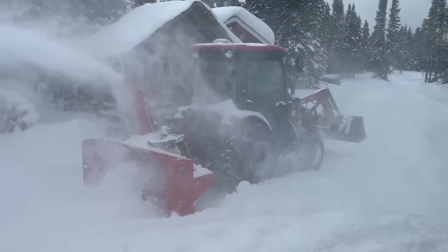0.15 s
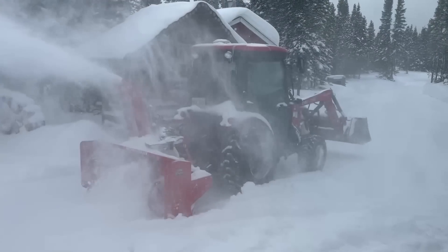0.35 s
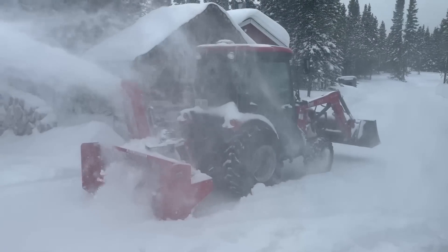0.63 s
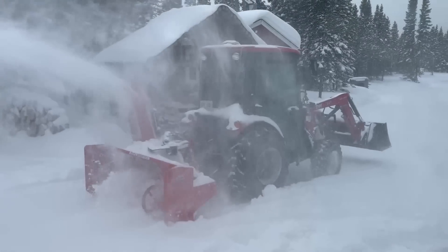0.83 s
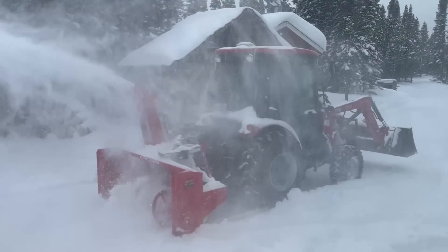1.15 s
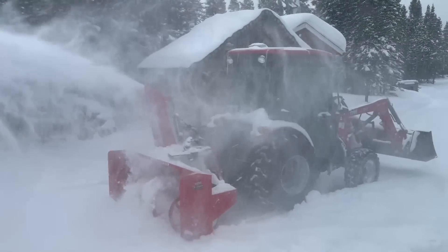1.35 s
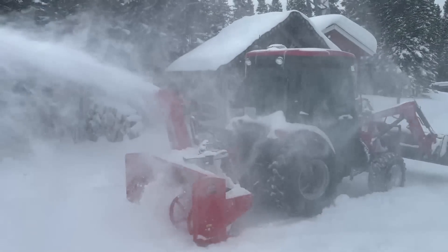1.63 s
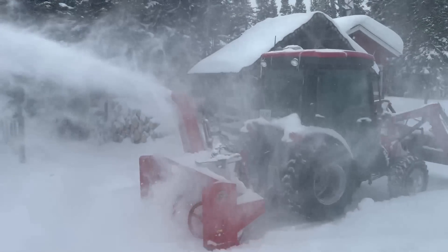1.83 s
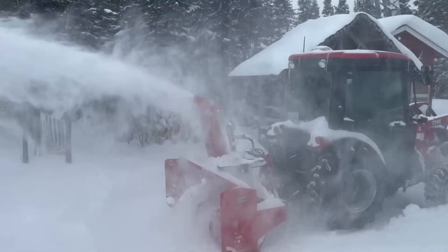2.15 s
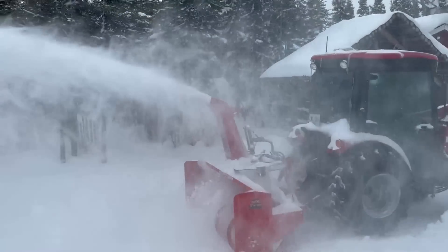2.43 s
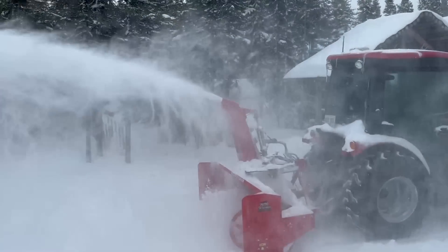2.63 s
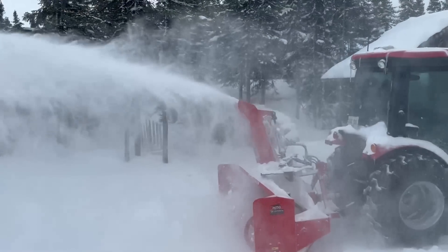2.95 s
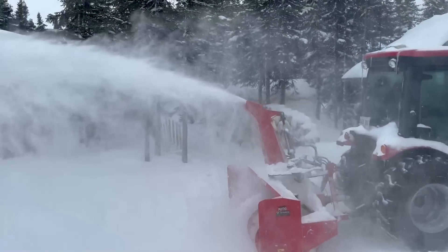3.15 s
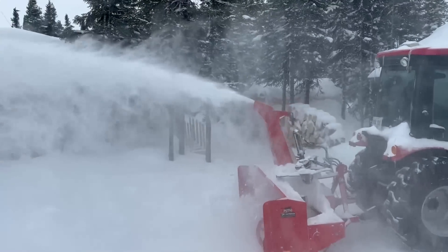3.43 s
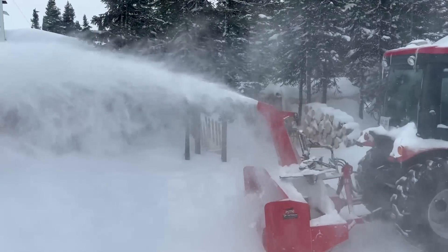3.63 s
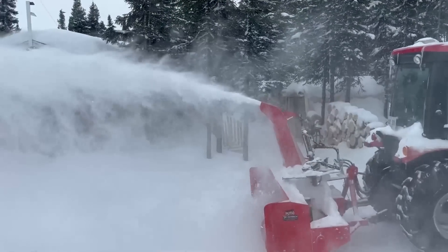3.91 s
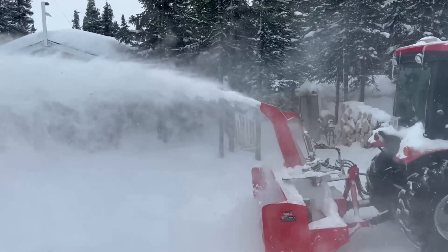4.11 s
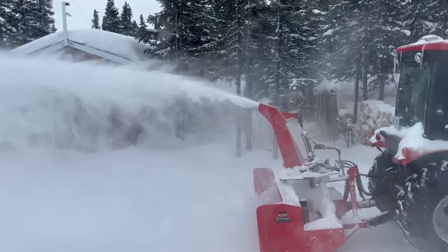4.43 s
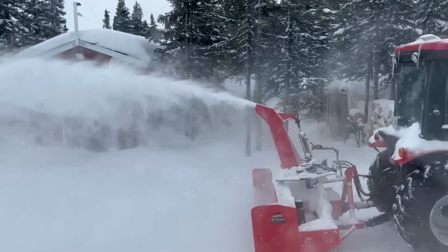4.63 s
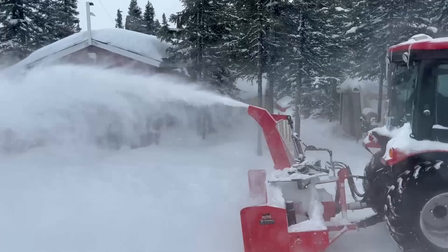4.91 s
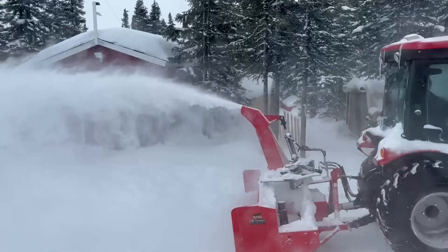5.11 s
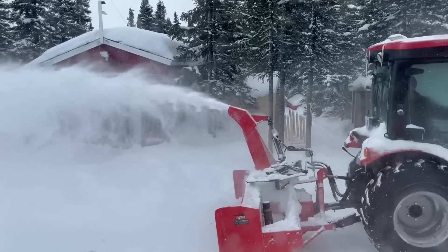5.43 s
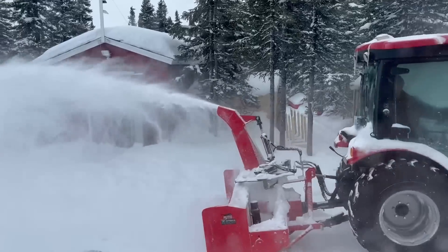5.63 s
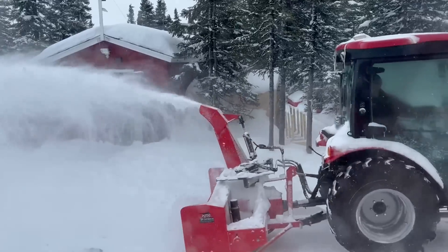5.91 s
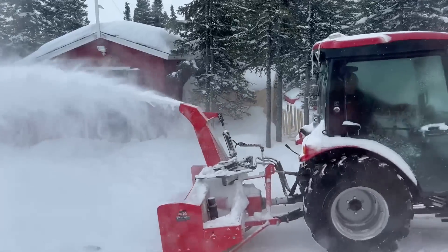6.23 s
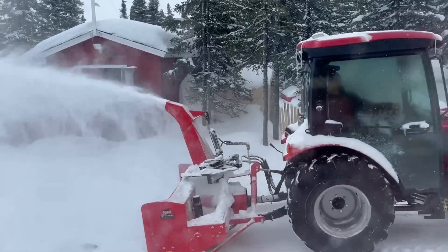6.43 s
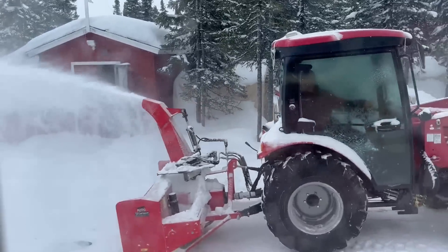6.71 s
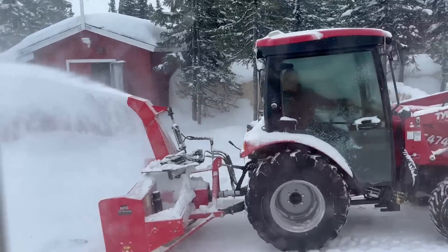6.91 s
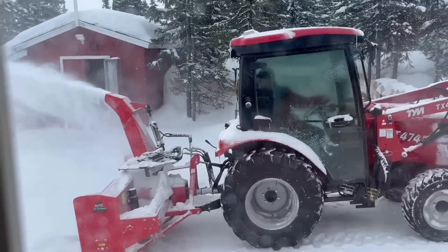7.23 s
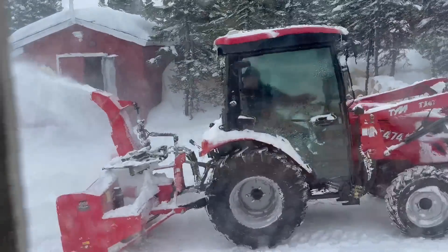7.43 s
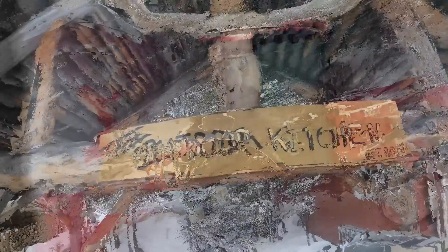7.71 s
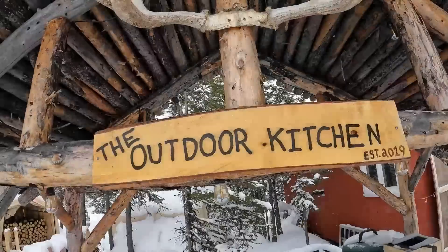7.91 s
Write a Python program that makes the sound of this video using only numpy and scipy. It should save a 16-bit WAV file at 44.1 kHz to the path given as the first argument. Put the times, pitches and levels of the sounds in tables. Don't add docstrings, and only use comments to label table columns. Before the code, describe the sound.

Tractor engine hum with a thudding snowblower and rushing snow spray, faint metal squeals and clinks, fading quickly to wind rumbling on the microphone.

```python
import sys
import numpy as np
from scipy import signal
from scipy.fft import rfft, irfft, next_fast_len
from scipy.io import wavfile
from scipy.ndimage import uniform_filter1d

SR = 44100
rng = np.random.default_rng(int(sys.argv[2]) if len(sys.argv) > 2 else 0)


def how_loud(loudness_db):
    steps = np.asarray(loudness_db, float) / 20
    return 10 ** steps


def generate_wav(sig):
    pcm = np.round(np.clip(np.atleast_2d(sig).T, -1, 1) * 32767).astype(np.int16)
    wavfile.write(sys.argv[1], SR, pcm)


N = 355446
TIME = np.arange(N) / SR
STEP = 12
FADE_S = (7.527, 7.951)
SNOW_ENDS_S = (7.4, 7.6)


def unit(x):
    return x / np.sqrt(np.mean(x ** 2) + 1e-20)


def along(points, hz, index=1):
    cols = np.transpose(points)
    return np.interp(np.log(hz + 1), np.log(cols[0] + 1), cols[index])


def curves(rows):
    s, *cols = np.transpose(rows)
    return [np.interp(TIME, s, c) for c in cols]


def between(share, start, end):
    return start + share * (end - start)


def ramp(start, end):
    return np.interp(TIME, [start, end], [0, 1])


def bursts(rows, rise, fall):
    def shape(s, hold, db):
        corners = np.cumsum([s - rise, rise, hold, fall])
        return np.interp(TIME[::STEP], corners, [0, how_loud(db), how_loud(db), 0])
    return np.interp(TIME, TIME[::STEP], sum(shape(*row) for row in rows))


def wobble(rate, step=1):
    return np.interp(np.arange(0, N, step) * rate / SR, np.arange(2500), rng.standard_normal(2500))


def filtered(x, response):
    m = next_fast_len(N + 8192)
    return irfft(rfft(x, m) * response(np.fft.rfftfreq(m, 1 / SR)), m)[..., :N]


def rush(spectrum, patchy_db):
    z = signal.stft(rng.standard_normal((2, N)), nperseg=512)[2]
    field = uniform_filter1d(rng.standard_normal(z.shape[1:]), 5, 0)
    field = uniform_filter1d(field, 12, 1)
    pair = signal.istft(z * how_loud(patchy_db * unit(field)), nperseg=512)[1][:, :N]
    return unit(filtered(pair, lambda hz: how_loud(along(spectrum, hz))))


def partial(turns, db, sway_db, blur, rate, start=None):
    def tone(chance):
        level = how_loud(db + sway_db * wobble(rate, STEP))
        phase = 2 * np.pi * (turns + (chance if start is None else start))
        return level * np.sin(phase + blur * wobble(rate, STEP))
    return np.sqrt(2) * np.array([tone(rng.random()), tone(rng.random())])


# frequency in Hz, level in dB per Hz.
BUFFET_COLOUR = [(15, -36.5), (35, -2.5), (60, 8.5), (110, -0.5), (200, -10), (300, -24.5), (500, -60),
                 (900, -120)]
# frequency in Hz, level in dB per Hz.
FLUTTER_COLOUR = [(60, -51), (150, 7), (300, -1.5), (520, -9), (850, -29), (1500, -50), (2800, -78),
                  (5000, -120)]
# frequency in Hz, level in dB per Hz.
WHIP_COLOUR = [(300, -40), (600, 0), (900, -9), (1500, -24), (2800, -36), (5000, -60), (8000, -120)]
# start in seconds, length in seconds, level in dB over the buffet.
FLAPS = [
    (7.9, .16, -22),
    (7.962, .003, -16),
    (7.986, .004, -11),
    (7.994, .012, -6),
    (8.013, .003, -8),
    (8.024, .012, -4),
    (8.041, .02, -4),
]
# time in seconds, size (minus is inward).
SNAPS = [
    (7.9635, -.35),
    (7.9862, .6),
    (7.9972, 1),
    (8.0145, -1.1),
    (8.0272, -.7),
    (8.031, -.7),
]


def wind():
    steady = [rush(colour, patchy_db=.5)[0] for colour in (BUFFET_COLOUR, FLUTTER_COLOUR, WHIP_COLOUR)]
    buffet, flutter, whip = [v / np.sqrt(np.abs(uniform_filter1d(v * v, 2500)) + .1) for v in steady]
    flaps = bursts(FLAPS, rise=.003, fall=.005) * how_loud(1.5 * wobble(90))
    gust = buffet + flaps * (flutter + how_loud(-21) * ramp(8.0, 8.025) * whip)
    snap_s = .0006
    snaps = sum(size * np.exp(-.5 * ((TIME - s) / snap_s) ** 2) for s, size in SNAPS)
    return how_loud(-31) * snaps + how_loud(-37) * ramp(7.75, 7.94) * gust


def yard_hum():
    return partial(120 * TIME[::STEP], -48.5, sway_db=1, blur=.1, rate=5)


# frequency in Hz, level in dB per Hz.
CLOTH = [(2000, -30), (3000, -3), (4500, 1), (5500, 0), (7235, -5), (7967, -14.0), (8182, -24.8),
         (8785, -25.2), (9776, -8.2), (11886, -7.6), (14298, -17.1), (14599, -33.0), (14771, -27.5),
         (15688, -120)]
# frequency in Hz, level in dB per Hz.
CLOTH_SIDE = [(3000, -24), (5200, -4), (7000, -3), (8400, 0), (9500, -1), (10600, -8), (14000, -6)]
# start in seconds, length in seconds, level in dB.
RUBS = [(.92, .28, -82), (.955, .01, -82), (1.08, .1, -86), (1.12, .06, -88), (1.2, .03, -90),
        (2.05, .02, -97), (2.585, .02, -95), (3.09, .05, -95), (4.08, .05, -95), (5.0, .1, -98),
        (6.52, .03, -94), (6.82, .02, -95), (7.3, .08, -95), (6.215, .03, -88), (6.3, .03, -89),
        (6.44, .03, -92), (7.022, .01, -88), (7.208, .018, -88), (7.5, .15, -97)]
# time in seconds, level in dB.
TICKS = [(0.9278, -67), (0.9424, -65), (0.9557, -60), (0.963, -67), (1.004, -69), (1.112, -72),
         (1.1694, -68), (1.2454, -82), (2.0594, -81), (2.5855, -75), (6.2203, -76), (6.3194, -78),
         (6.4694, -79), (7.0229, -74), (7.214, -73)]


def rustle(turn, closing):
    side_db = -3.5
    grains = how_loud(2 * wobble(250) + 1.5 * wobble(40)) * rush(CLOTH, patchy_db=1)
    side = how_loud(side_db) * rush(CLOTH_SIDE, patchy_db=2)[0] * [[1], [-1]]
    sifting = how_loud(between(turn, -97, -94.5) + 1.5 * wobble(6.6))
    level = sifting + bursts(RUBS, rise=.004, fall=.025)
    hiss = how_loud(2) * (closing + .2) * level * (grains[0] + side)
    ticks, t = np.zeros(N + 400), np.arange(300) / SR
    for s, db in TICKS:
        tick = how_loud(-60 * t / .002) * rng.standard_normal(len(t))
        ticks[round(s * SR):][:len(t)] += how_loud(db - 3) * unit(tick)
    mid, side = filtered(ticks[:N], lambda hz: how_loud([along(CLOTH, hz), along(CLOTH_SIDE, hz) + side_db]))
    return hiss + mid + side * [[1], [-1]]


# start in seconds, end in seconds, frequency in Hz, level in dB, blur in radians.
SQUEALS = [(0, 2.9, 1722, -72, .9), (.4, 1.2, 1150, -68, .4), (2.3, 2.7, 1210, -70, .4),
           (1.65, 1.95, 1700, -66, .6), (.95, 1.2, 1560, -67, .5), (.5, .85, 4700, -81, 4.5),
           (1.65, 2.0, 5000, -83, 3), (7.05, 7.5, 3300, -78, .4), (6.17, 6.3, 6300, -82, 4.5),
           (2.9, 3.6, 1730, -73.5, 1.1), (1.648, 2.1, 4200, -76, 3.2), (1.947, 2.6, 3250, -76, 4.2),
           (3.9, 6.2, 3750, -78, 4.2), (5.2, 5.6, 3357, -74.5, 0.4), (6.5, 7.3, 4420, -81.5, 1.7),
           (7.019, 7.037, 4420, -63.5, .7), (7.02, 7.034, 4700, -68, .7), (2.9, 4.6, 900, -66, 1.2),
           (2.6, 3.7, 1750, -70, 1.3), (6.2, 7.7, 1100, -69, .6), (6.1, 7.1, 2300, -73, .8),
           (1.85, 2.65, 1415, -66.5, .7), (1.4, 2.1, 745, -66, 1.3), (.9, 1.65, 1717, -66, .35),
           (.9, 1.7, 1324, -71, .5), (.4, 1.7, 1507, -69, .7), (.2, .95, 1890, -68, .55),
           (2.3, 2.95, 1700, -67, .7), (5.2, 6.2, 5500, -90, 3), (6.9, 7.2, 6050, -88, 3.5),
           (.9, 1.25, 4150, -82, 4)]


def squeal():
    out = np.zeros(N)
    for start, end, hz, db, blur in SQUEALS:
        on = slice(round(start * SR), round(end * SR))
        edge_s = min(.063, (end - start) / 3)
        swell = np.clip(np.minimum(TIME[on] - start, end - TIME[on]) / edge_s, 0, 1)
        whistle = np.sin(2 * np.pi * hz * TIME[on] + blur * wobble(150)[on])
        out[on] += swell * how_loud(db + 1.5 * wobble(20)[on]) * whistle
    return out


# time in seconds, peak in dB, frequency in Hz.
CLINKS = [(0.0712, -65, 4090), (0.0962, -61, 4150), (0.1396, -62, 4110), (0.166, -66, 4140),
          (0.2049, -65, 4630), (0.2309, -59, 4620), (0.2588, -62, 4150), (0.2783, -60, 4150),
          (0.3765, -60, 4170), (0.3944, -59, 4100), (0.5407, -58, 4690), (0.5926, -63, 3840),
          (0.6853, -64, 5120), (0.7422, -65, 4940), (0.8071, -66, 4520), (1.1644, -58, 4660),
          (1.5838, -66, 3990), (2.0098, -66, 4200), (3.015, -64, 3800), (3.1098, -62, 3890),
          (4.4672, -61, 3860), (4.5496, -65, 3950), (4.5965, -65, 3850), (5.5199, -58, 3860),
          (5.7149, -64, 3830), (5.8985, -64, 3800), (6.0965, -63, 4030), (7.2853, -64.5, 4280)]


def chain():
    out, t = np.zeros(N + SR), np.arange(1500) / SR
    t60_s, attack_s = 0.033, 0.0012
    for s, db, hz in CLINKS:
        ring = np.sin(2 * np.pi * hz * t) + how_loud(-5) * np.sin(2 * np.pi * 1.13 * hz * t)
        out[round(s * SR):][:len(t)] += how_loud(db - 2 - 60 * t / t60_s) * (1 - np.exp(-t / attack_s)) * ring
    return out[:N]


# start in seconds, length in seconds, frequency in Hz, level in dB.
DRUMS = [
    (5.2, .7, 312, -52),
    (7.1, .38, 283, -45.5),
    (5.0, .25, 217, -47),
    (5.75, .25, 250, -49),
    (.25, .25, 282, -47),
    (1.75, .25, 282, -47),
    (2.7, .3, 282, -46),
    (3.55, .45, 430, -54),
    (4.25, .7, 436, -59),
    (5.75, .3, 283, -49),
]


def plates():
    return sum(bursts([(s, hold, db)], rise=.08, fall=.08)[::STEP]
               * partial(hz * TIME[::STEP], 0, sway_db=2, blur=.3, rate=10) for s, hold, hz, db in DRUMS)


# frequency in Hz, level in dB per Hz.
RUMBLE_COLOUR = [(20, -61.5), (30, -26.5), (42, -3.5), (56, 2.5), (68, -1), (100, -2), (135, -3),
                 (180, 3.5), (200, -7), (250, 0), (300, -8), (345, -12.5), (420, -21), (520, -66.5)]


def augers(fade_db):
    dig_db = 3 - 12.5 * (1 - ramp(0, 0.72)) - 4 * ramp(*SNOW_ENDS_S)
    rumble = how_loud(fade_db + dig_db - 43.5 + wobble(3)) * rush(RUMBLE_COLOUR, patchy_db=1)
    growl = how_loud(between(ramp(1.5, 7.2), -4.5, 8))
    return rumble + (growl - 1) * filtered(rumble, lambda hz: hz < 65.6)


# time in seconds, firing rate in Hz, level of the first order in dB.
ENGINE = [(0, 79.56, -38), (.4, 79.56, -50), (.8, 79.58, -33), (1.05, 79.45, -31.5), (1.4, 78.8, -36),
          (1.75, 79.3, -30), (2.2, 79.42, -26.4), (2.85, 79.35, -28.2), (3.6, 79.83, -24.2),
          (4.2, 80.24, -25.6), (4.85, 80.48, -27.4), (5.4, 79.97, -25.8), (5.9, 80.0, -26.2),
          (6.45, 79.55, -26.1), (7.0, 79.08, -22.6), (7.28, 78.8, -23.2), (7.5, 78.58, -25.3),
          (8.06, 78.6, -24.5)]
# time in seconds, tailpipe minus intake (a factor).
PIPE = [(0, -.44), (.9, -.5), (1.4, -.33), (2.0, .02), (2.4, .3), (3.2, .52), (3.6, .7), (4.6, .9),
        (5.1, 1.2), (6.0, 1.05), (7.2, .85), (8.06, .7)]
# multiple of the firing rate, level in dB.
CRANK = [(.5, -55), (.75, -56), (1.25, -60), (1.75, -54), (2.5, -58), (3, -58)]


def engine(firings, fade_db, closing):
    first_db = curves(ENGINE)[1][::STEP]
    tailpipe = how_loud(-35) * curves(PIPE)[0][::STEP]
    first = partial(firings, first_db, sway_db=.6, blur=0.022, rate=3.7, start=0)
    second = partial(2 * firings, 0, sway_db=.9, blur=.1, rate=8, start=.148)
    weak = sum(partial(k * firings, db + fade_db, sway_db=3, blur=0.3, rate=6) for k, db in CRANK)
    return closing * (first + np.sqrt(closing) * tailpipe * second + yard_hum()) + weak


# multiple of the blade rate, then level in dB heard from the blower end,
# from the side and from behind the chute.
BLADES = [(1, -69, -68.5, -67), (2, -42.5, -53, -47.5), (3, -62.5, -65, -58.5), (4, -61, -56, -46.5),
          (6, -53.5, -44.5, -51), (7, -43.5, -52, -52), (8, -55.5, -52.5, -54), (9, -56.5, -60, -62.5),
          (10, -53.5, -62, -59), (11, -56.5, -62.5, -67.5), (12, -58.5, -53, -58.5),
          (13, -65.5, -65.5, -66), (14, -66.5, -67, -68), (15, -69, -66.5, -68), (16, -70.5, -65.5, -75),
          (17, -76, -70.5, -67), (18, -65.5, -64, -67)]
# frequency in Hz, level in dB from the end, level in dB from the side,
# blur in radians.
HOUSING = [(113.5, -47, -57.5, 0.32), (268, -54, -59.5, 1.2), (280.4, -47, -49, .9), (312.8, -59, -56, 1.6)]
# start in seconds, length in seconds, level in dB.
BOOMS = [
    (.3, 0.056, -2),
    (1.0, 0.031, 3.5),
    (1.3, 0.5, 6.5),
    (2.6, 0.33, -5.5),
    (3.5, 0.079, 5),
    (4.3, .35, 1.5),
    (5.4, .15, 7),
    (5.9, 0.11, 5.5),
    (6.5, 0.22, 5),
    (7.0, 0.33, 13),
]


def impeller(firings, blades, turn, slap_db):
    passed = ramp(3.8, 6.6)[::STEP]
    out = 0
    for k, end_db, side_db, behind_db in BLADES:
        view_db = between(turn, end_db, side_db) + passed * (behind_db - side_db)
        out = out + partial(k * blades, view_db + slap_db, sway_db=1.9, blur=.17, rate=6)
    swell = how_loud(-6.5) + bursts(BOOMS, rise=0.14, fall=0.14)[::STEP] / 2
    boom_db = between(turn, -41.5, -40) + slap_db + 20 * np.log10(swell)
    out = out + partial(2.25 * firings, boom_db, sway_db=2.8, blur=.75, rate=12)
    for hz, end_db, side_db, blur in HOUSING:
        plate_db = between(turn, end_db, side_db) + slap_db
        out = out + partial(hz * TIME[::STEP], plate_db, sway_db=3.5, blur=blur, rate=12)
    return out


PUFF = [(1, .085), (2, .04), (3, .04), (4, .04)]
# frequency in Hz, level in dB per Hz.
FRONT_ROAR = [(190, -32), (330, -19), (441, -8), (531, -17.5), (652, -8.5), (695, -16), (886, -21),
              (1120, -16), (1340, -20.5), (1510, -14.5), (1720, -15), (2210, -24.5), (2420, -21.5),
              (2810, -42.5), (3060, -40.5), (3980, -69.5), (6730, -120)]
# frequency in Hz, level in dB per Hz.
FLANK_ROAR = [(190, -30.5), (330, -2), (383, -11), (436, 1), (470, -11.5), (610, -9.5), (830, -11),
              (903, -5), (1260, -18.5), (1470, -12.5), (1610, -16), (1730, -15.5), (2090, -23),
              (2340, -15.5), (3060, -29.5), (3980, -64), (6730, -120)]
# frequency in Hz, level in dB per Hz.
FRONT_SPRAY = [(2160, -35.5), (2713, -4), (3143, 2.5), (3574, -3), (4134, 0.5), (4349, -2), (4694, -2),
               (5038, -2.5), (5211, -5.5), (5943, -13), (7493, -26.5), (7708, -43), (8268, -41.5),
               (8798, -120)]
# frequency in Hz, level in dB per Hz.
FLANK_SPRAY = [(2160, -30), (2713, -9.5), (2971, -25.5), (3143, 1), (3832, -2.5), (4091, -7.5), (4435, -6),
               (5469, -15), (5727, -20), (6201, -15), (7493, -36.5), (7665, -50.5), (8268, -37),
               (8798, -120)]
# frequency in Hz, width in Hz, level in dB.
PANELS = [(625, 19, -23.5), (970, 48, -15.5), (1180, 21, -23.5), (1453, 76, -7.5), (1444, 81, -10),
          (1704, 56, -8.5), (1880, 70, -15), (2500, 230, -20)]


def tin_panels():
    def modes(f):
        return sum(how_loud(db) * 1j * f * w / (c * c - f * f + 1j * f * w) for c, w, db in PANELS)

    def skirts(f):
        return 1 / (1 + (f / 2600) ** 8) / (1 + (500 / (f + 1)) ** 4)
    ringing = filtered(rng.standard_normal((2, N)), lambda f: modes(f) * skirts(f))
    return unit(ringing * how_loud(2 * wobble(18)))


def chute(blades, turn, spray_turn, roar_db, spray_db):
    def blend(share, front, flank):
        return np.sqrt(1 - share) * front + np.sqrt(share) * flank
    puffs = 1 + sum(depth * np.sin(2 * np.pi * k * blades) for k, depth in PUFF)
    flank = how_loud(3.5) * rush(FLANK_ROAR, patchy_db=0.83)
    roar = how_loud(4.5) * blend(turn, rush(FRONT_ROAR, patchy_db=1.5), flank)
    roar = roar - .5 * ramp(*SNOW_ENDS_S) * filtered(roar, lambda hz: hz < 416)
    tin = how_loud(4.5) * (0.041 + 0.71 * turn) * tin_panels()
    spray = blend(spray_turn, rush(FRONT_SPRAY, patchy_db=1.2), rush(FLANK_SPRAY, patchy_db=1.2))
    spray = how_loud(spray_db + 2.5 + 1.0 * wobble(14)) * np.sqrt(puffs) * spray
    return how_loud(roar_db) * (puffs * (roar + tin) + spray)


# frequency in Hz, likeness (0-1), lead of the left in radians,
# left over right in dB.
PORTS = [(82, 1, 0.13, 0.93), (270, 0.99, 0.33, 1.7), (370, 0.6, 1.17, 3), (453, 0.1, 0, 3),
         (700, .2, 2.5, 0.5), (905, 0.6, 4, 6.5), (1150, 1, 4.5, 0), (1510, .87, 3.5, -7),
         (1580, .85, 2, -6.5), (1620, 0.3, 0, -4), (1760, 0.8, 0.53, -4.5), (2190, 0.88, 0, 0),
         (4800, .84, .5, 1.4), (7350, 0.5, -2.2, 0.6)]


def ports(pair):
    def response(hz):
        like = np.clip(along(PORTS, hz), 0, 1)
        lead = along(PORTS, hz, index=2)
        tilt = how_loud(along(PORTS, hz, index=3) / 2)
        mean = np.sqrt(tilt ** 2 + tilt ** -2 + 2 * like * np.cos(lead)) / 2
        return np.array([tilt, like * np.exp(-1j * lead) / tilt, np.sqrt(1 - like ** 2) / tilt]) / mean
    left, shared, own = filtered(pair[[0, 0, 1]], response)
    return np.array([left, shared + own])


# time in seconds, share of the side view (0-1) for the roar,
# the same for the spray.
TURN = [
    (0, 0.06, 0),
    (1.5, 0.16, 0.095),
    (2.3, 0.3, 0.51),
    (3.2, 0.94, 0.64),
    (4.5, 1, 1),
    (8.06, 0.84, 0.63),
]
# time in seconds, blade rate shift in Hz.
SLIP = [(0, -.07), (.8, -.13), (1.2, .04), (2.2, 0), (3.3, .04), (4.3, .02), (4.8, -.04), (6.2, 0),
        (6.8, -.1), (8.06, -.05)]
# time in seconds, level in dB.
BITE = [
    (0, -4),
    (1.1, -3.5),
    (1.5, -1.5),
    (4.5, 0),
    (6.0, -0.5),
    (7.35, -0.5),
    (7.6, -7),
    (8.06, -12.5),
]


def scene():
    firings = np.cumsum(curves(ENGINE)[0]) / SR
    blades = .4525 * firings + np.cumsum(curves(SLIP)[0]) / SR
    turn, spray_turn = np.clip(curves(TURN), 0, 1)
    clear = ramp(1.1, 1.8)
    closing = 1 - ramp(*FADE_S)
    roar_db = between(clear, -55.5, -59.5) + 0.52 * wobble(2.7) + 20 * np.log10(closing + 1e-3)
    spray_db = between(clear, -20.5, -15.5) + 2 * (1 - closing)
    fade_db = roar_db + 57
    slap_db = fade_db + curves(BITE)[0]
    tones = engine(firings[::STEP], fade_db[::STEP], closing[::STEP]) + plates()
    tones = tones + impeller(firings[::STEP], blades[::STEP], turn[::STEP], slap_db[::STEP])
    tones = signal.resample_poly(tones, STEP, 1, axis=1, window=("kaiser", 14))[:, :N]
    tractor = closing * squeal() + chain() + augers(fade_db)
    tractor = tractor + chute(blades, turn, spray_turn, roar_db, spray_db)
    return ports(tractor + tones) + rustle(turn, closing) + wind()


# frequency in Hz, level in dB.
PORT_DIP = [(7000, 0), (7800, -1), (8100, -10), (8850, -10), (9150, 0), (13300, 0), (14000, -9)]
# frequency in Hz, level of their difference in dB.
SIDE_TOP = [(10600, 0), (11100, -30), (12800, -30), (13500, -9), (14000, -14)]


def microphone(dry):
    side = filtered((dry[0] - dry[1]) / 2, lambda hz: how_loud(along(SIDE_TOP, hz)))
    return filtered(dry.mean(0), lambda hz: how_loud(along(PORT_DIP, hz))) + side * [[1], [-1]]


def clock_mirror(dry):
    bass = filtered(dry.mean(0), lambda hz: 1 / (1 + (hz / 260) ** 4))
    return how_loud(-65) * (1 - ramp(*FADE_S) ** 6) * bass * np.cos(2 * np.pi * 9600 * TIME)


def top_cut(x):
    return signal.sosfilt(signal.butter(12, 14400, fs=SR, output="sos"), x)


def record(dry):
    release = 1 - ramp(TIME[-1] - .006, TIME[-1])
    return top_cut((microphone(dry) + clock_mirror(dry)) * release)


dry = scene()
out = record(dry)
generate_wav(out)
```